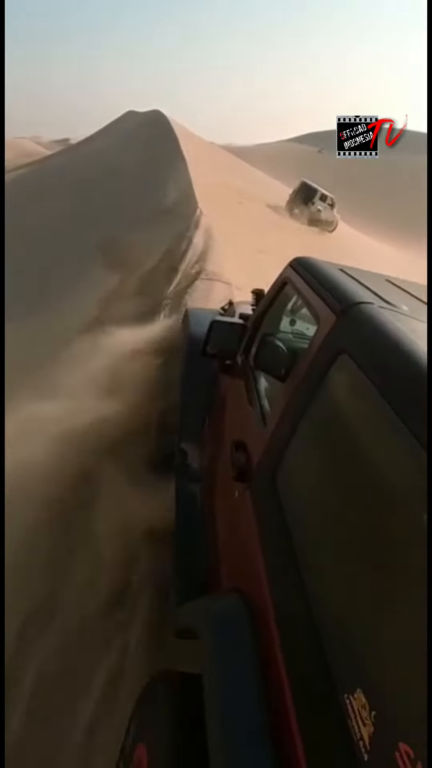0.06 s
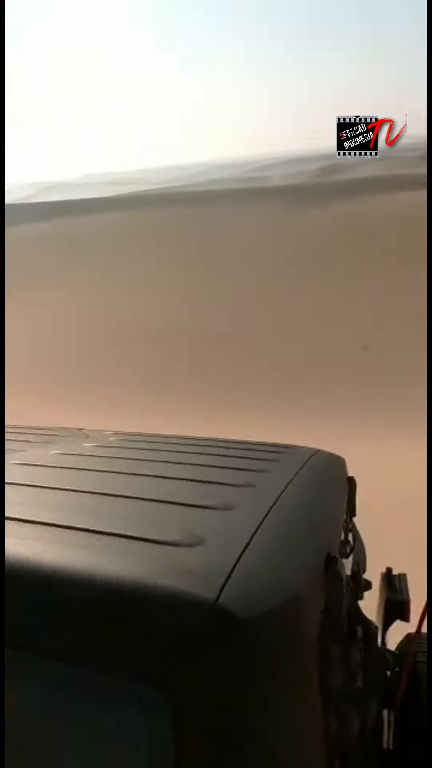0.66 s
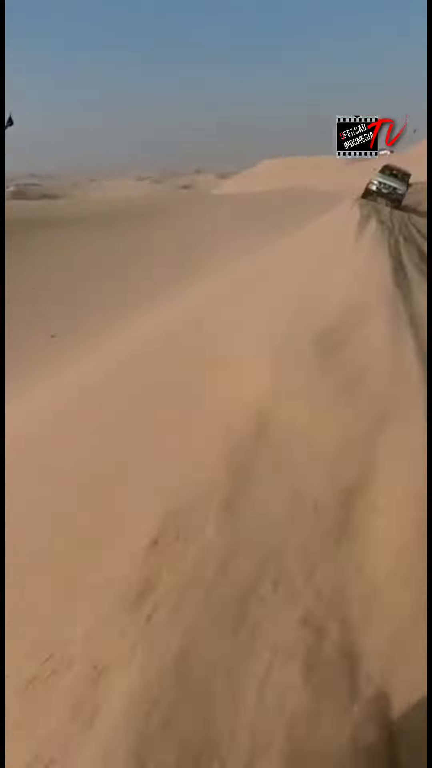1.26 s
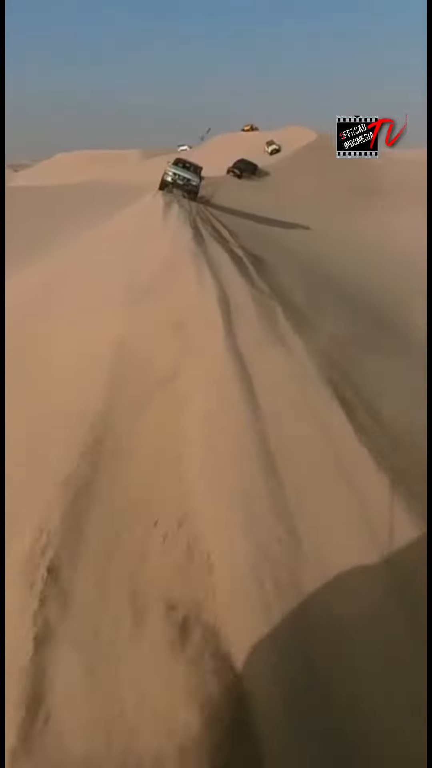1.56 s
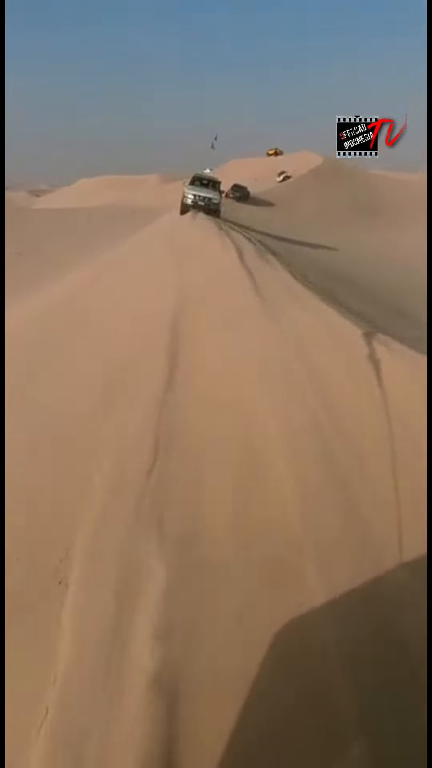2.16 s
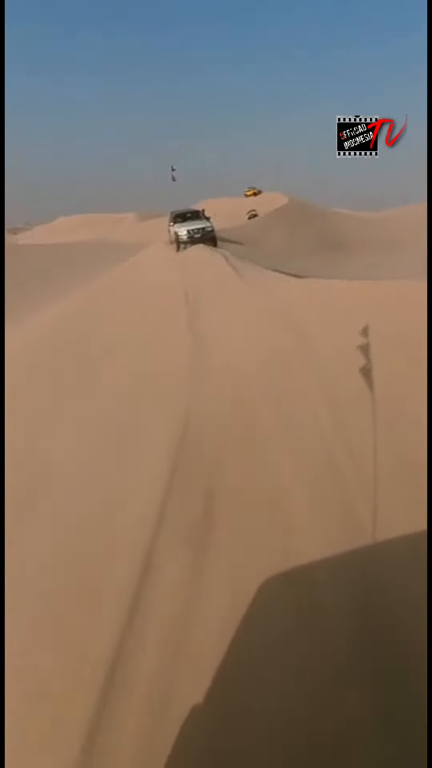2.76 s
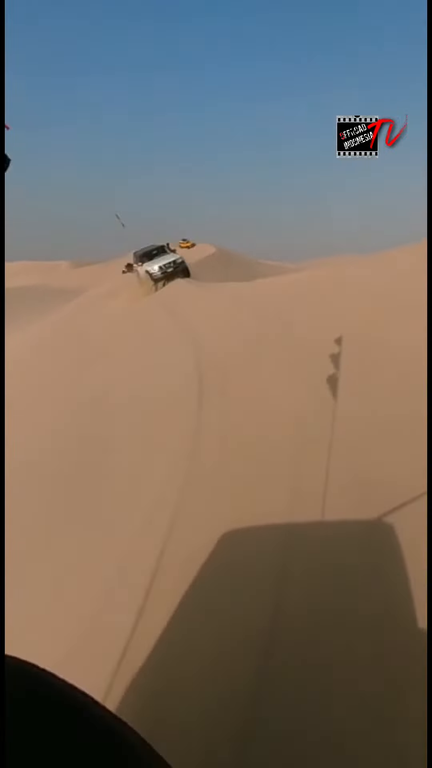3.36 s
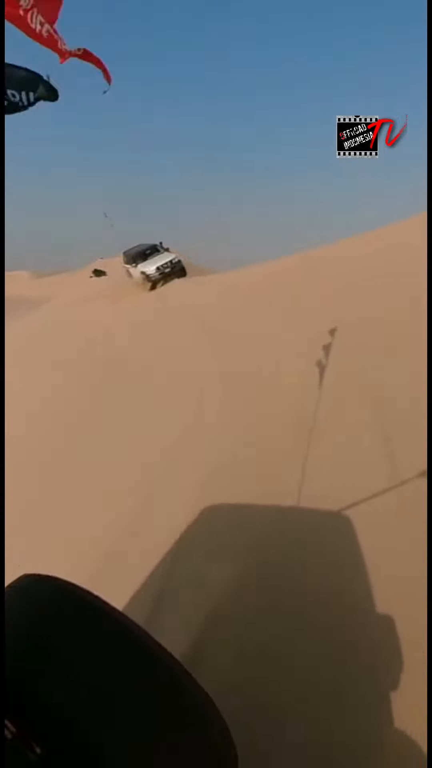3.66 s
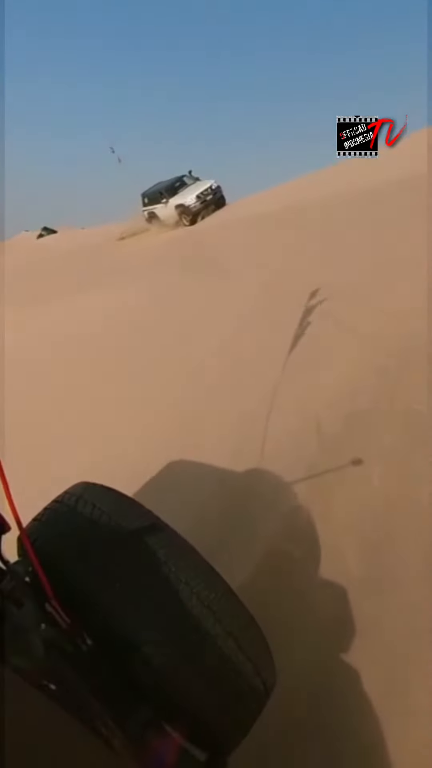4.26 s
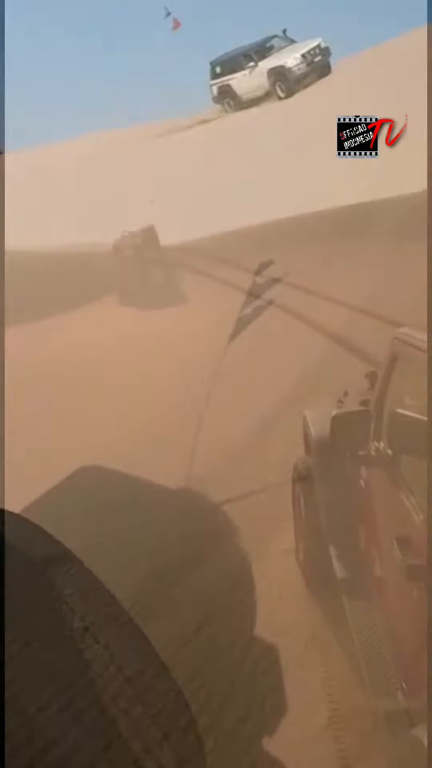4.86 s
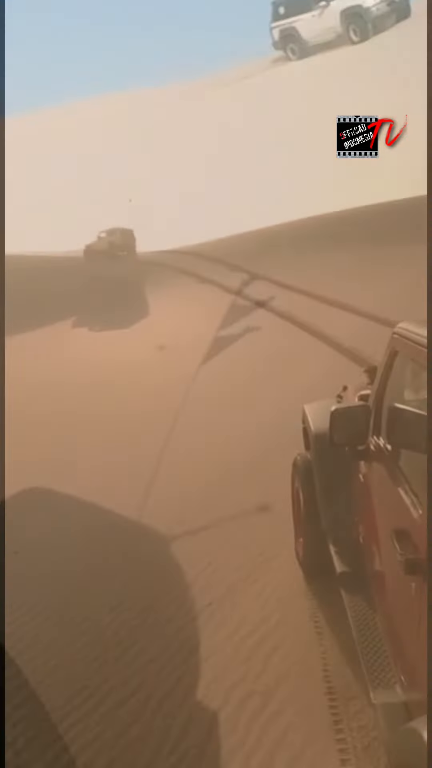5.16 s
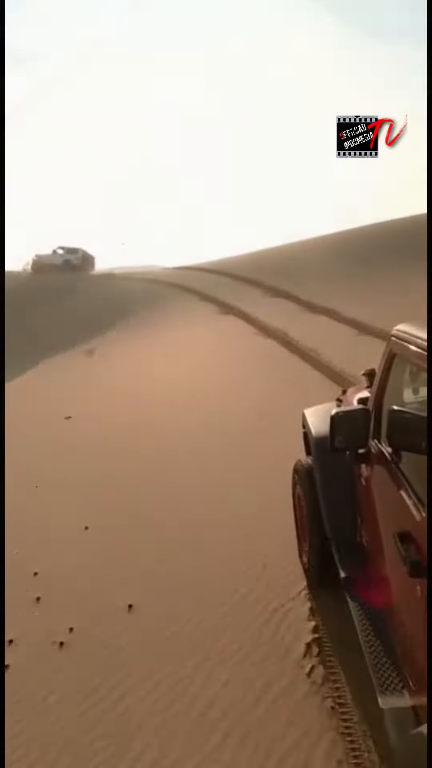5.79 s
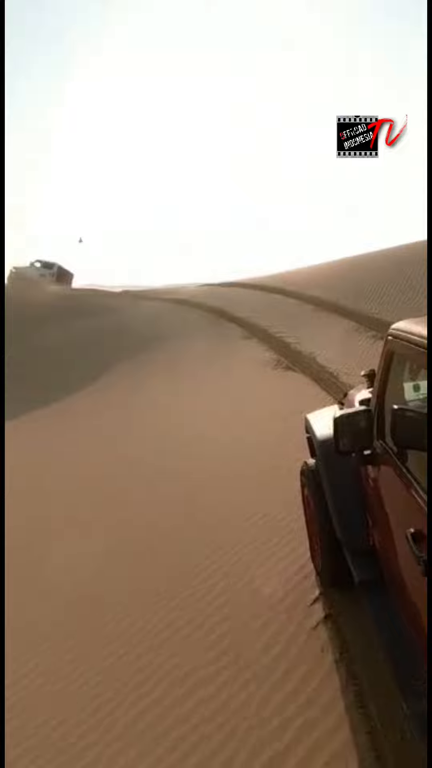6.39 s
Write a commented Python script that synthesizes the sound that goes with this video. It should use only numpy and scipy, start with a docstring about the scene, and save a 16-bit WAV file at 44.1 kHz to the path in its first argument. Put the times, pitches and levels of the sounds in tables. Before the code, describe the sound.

A four-wheel-drive engine drones close by on soft sand, sagging and revving again, while heavy wind rumbles and pops on the microphone.

```python
"""An engine drones close by in buffeting wind: a four-wheel-drive on soft dunes, the microphone held out
beside its body. The engine sags, pulls and revs up again over a gear whine and the roar and hiss of sand
under the tyres; another car swells in from behind. Wind rumbles, thumps and pops on the microphone and
grains tick on its housing; the level dips briefly after loud pops, and deeply after the hardest blow."""
import sys
import numpy as np
from scipy import signal
from scipy.fft import rfft, irfft
from scipy.io import wavfile
from scipy.ndimage import uniform_filter1d, minimum_filter1d

SR = 44100
rng = np.random.default_rng(int(sys.argv[2]) if len(sys.argv) > 2 else 0)


def generate_wav(signal):
    """Clip the signal to [-1, 1] and save it as 16-bit WAV at the path in sys.argv[1]."""
    frames = np.transpose(np.atleast_2d(signal))
    scaled = np.clip(frames, -1, 1) * 32767
    pcm = np.round(scaled).astype(np.int16)
    wavfile.write(sys.argv[1], SR, pcm)


N = 292383
TIME = np.arange(N) / SR
BINS = np.fft.rfftfreq(N, 1 / SR)
BLOW_S = 4.0539  # the hardest blow of air hits the microphone

# eddies that pop on the microphone: (time [s], relative level [dB], centre [Hz])
POPS = [(0.09, -6.5, 226), (1.094, 2.5, 102.7), (1.104, -19, 323), (1.144, -13, 295), (1.324, -4, 147.6),
        (1.634, -15, 418.4), (1.92, -18, 446), (2.06, -18, 352.1), (2.123, -2.5, 148), (2.129, -3.5, 191),
        (2.1327, -6, 204), (2.284, -16.5, 302), (2.293, -4.5, 205), (2.306, -8, 251), (2.314, 1.5, 150),
        (2.317, -8.5, 247), (2.374, -9.5, 160.8), (2.38, -30, 245), (2.48, -16.5, 196), (2.505, -21, 211),
        (2.658, -25.5, 393), (3.217, -20, 302.8), (3.595, -16, 187.6), (4.017, -14.5, 196)]


def amp(db):
    """Decibels to gain."""
    return 10 ** (np.asarray(db) / 20)


def unit_rms(x):
    """Scales to rms 1."""
    return x / np.sqrt(np.mean(x ** 2) + 1e-20)


def curves(rows):
    """Each column of a table, joined by straight lines in time."""
    s, *columns = np.transpose(rows)
    return [np.interp(TIME, s, c) for c in columns]


def bump(s, length):
    """A smooth swell of height 1 around a time."""
    return np.exp(-(2 * (TIME - s) / length) ** 2)


def noise(spectrum):
    """Noise of rms 1 with the given spectrum."""
    hz, db = np.transpose(spectrum)
    colour = amp(np.interp(np.log(BINS + 1), np.log(hz), db))
    return unit_rms(irfft(rfft(rng.standard_normal(N)) * colour, N))


def drift(rate_hz):
    """A random wander of rms 1, up to about the given rate."""
    return unit_rms(irfft(rfft(rng.standard_normal(N)) / (1 + (BINS / rate_hz) ** 4), N))


def filtered(x, hz, kind, order):
    """A causal low-pass or high-pass."""
    return signal.sosfilt(signal.butter(order, hz, kind, fs=SR, output="sos"), x)


def add(mix, s, sound):
    """Mixes a sound in at a time."""
    part = mix[max(round(s * SR), 0):][:len(sound)]
    part += sound[:len(part)]


def partial(turns, flutter, smear):
    """A tone that wavers in strength (flutter) and phase (smear) as the moving air carries it."""
    phase = 2 * np.pi * (turns + rng.random()) + smear * drift(rate_hz=5.7)
    return np.sqrt(2) * np.cos(phase) * (1 + flutter * drift(rate_hz=32))


def resonance_db(modes, hz):
    """The gain that a gliding tone picks up from a table of resonances."""
    return sum(db / (1 + (2 * (hz - centre) / width) ** 2) for centre, width, db in modes)


def click(top_hz):
    """A dry click of height 1."""
    pulse = filtered(signal.unit_impulse(256), top_hz, "low", order=6)
    pulse = filtered(pulse, 3400, "low", order=1)
    return pulse / abs(pulse).max()


def follower():
    """The car behind: its drone carries over in swells, each on a rising note."""
    # swells: (start [s], length [s], first pitch [Hz], last pitch [Hz], top level [dB])
    swells = [(1.621, 0.8, 211.1, 253, -25), (2.852, 0.64, 267, 297.2, -31.5),
              (4.453, 1, 266.5, 277.3, -34)]
    out = np.zeros(N)
    for start, length, first_hz, last_hz, db in swells:
        progress = np.clip((TIME - start) / length, 0, 1)
        turns = np.cumsum(first_hz + (last_hz - first_hz) * progress) / SR
        out += amp(db) * np.sin(np.pi * progress) ** 2 * partial(turns, flutter=0.39, smear=0.05)
    return out


def grit(spread_db=5.5):
    """Blown grains hit the microphone's housing one by one, coarse then fine; a few are larger."""
    # showers: (start [s], end [s], rate [1/s], level before filtering [dB], low [Hz], high [Hz])
    showers = [(0, 4.2, 35, -59, 2800, 5500), (4.3, 6, 50, -64, 6000, 15000)]
    out = np.zeros(N)
    for start, end, per_s, db, low_hz, high_hz in showers:
        size_db = spread_db * np.minimum(rng.exponential(1, N), 2)
        hits = (rng.random(N) < per_s / SR) * (TIME > start) * (TIME < end)
        grains = filtered(hits * amp(db + size_db), low_hz, "high", order=2)
        out += filtered(grains, high_hz, "low", order=4)
    return out


def ticks():
    """A few tiny, separate clicks."""
    # dry clicks: (time [s], peak [dB], treble cutoff [Hz])
    clicks = [(1.070, -32.5, 6400), (2.11, -39.5, 5000), (3.871, -26, 14000), (4.0393, -31.5, 7000),
              (4.0993, -49, 3400), (5.89, -33.5, 12600)]
    out = np.zeros(N)
    for s, db, hz in clicks:
        add(out, s, amp(db) * click(hz))
    return out


def wind_db():
    """Strength of the wind at the microphone: a slow trend with gusts and lulls on top."""
    # wind trend: (time [s], relative level [dB])
    trend_points = [(0, -21.5), (1.1, -20.5), (2.4, -18.5), (4.05, -20), (4.2, -30), (5.25, -27.5),
                    (6.05, -19), (6.63, -19)]
    # gusts (+) and lulls (-): (time [s], length [s], change [dB])
    gusts = [(0.288, 0.031, -8.5), (1.463, 0.04, -5.5), (2.166, 0.019, -14), (2.432, 0.03, -9.5),
             (2.954, 0.02, -9), (3.384, 0.2, 3), (3.489, 0.056, -11), (3.6, 0.12, 7), (3.73, 0.2, -11),
             (5.286, 0.05, 8.5), (5.418, .1, -4.5)]
    trend, = curves(trend_points)
    return trend + sum(db * bump(s, length) for s, length, db in gusts)


def wind(gain_db=1.5, steadiness=0.79, chop_db=2.0):
    """Low turbulence on the microphone, swelling with each gust and chopped by quick buffets."""
    # rumble spectrum: (frequency [Hz], relative density [dB])
    spectrum = [(15, -19), (30, -11), (48, 1), (70, -1.5), (115, -2.5), (160, -6.5), (230, -17),
                (400, -31.5), (2000, -92.5)]
    rumble = noise(spectrum)
    envelope = np.sqrt(abs(uniform_filter1d(rumble ** 2, size=4000)) + 1e-6)
    steadied = unit_rms(rumble / envelope ** steadiness)
    return amp(wind_db() + gain_db + chop_db * drift(rate_hz=11)) * steadied


def buffeted(rumble, pitch_hz=78, length_s=.024, displaced=.6):
    """Big slow eddies displace part of the rumble and thump: a swing or two of air in the port."""
    # thumps on the microphone: (time [s], level [dB])
    thumps = [(0.468, -11), (0.745, -11.5), (1.094, -7.5), (1.153, -10.5), (1.237, -9.5), (2.011, -11),
              (2.451, -8), (2.549, -8), (2.697, -8.5), (2.736, -8), (3.286, -6), (3.439, -6.5),
              (3.603, -7.5), (5.981, -9.5), (6.072, -7.5), (6.345, -7)]
    for s, db in thumps:
        phase, speed = rng.random(2)
        swell = bump(s, length_s)
        hz = pitch_hz * (.88 + .24 * speed)
        swing = np.cos(2 * np.pi * (hz * (TIME - s) + phase))
        rumble = rumble * (1 - displaced * swell) + amp(db) * swell * swing
    return rumble


def eddy(hz):
    """A vortex passes the microphone's port: a pressure swing, shorter when faster, then a weaker wake."""
    angle = 2 * np.pi * hz * np.arange(-1024, 1024) / SR
    lag = rng.uniform(1.5, 4)
    front, wake = np.exp(2j * np.pi * rng.random(2))
    swing = front / (1 - 1j * angle) ** 2 + .7 * wake / (1 - 1j * (angle - lag)) ** 3
    return swing.real * signal.windows.hann(len(angle))


def eddies(rows):
    """Mixes one eddy for each row of (time [s], level [dB], centre [Hz])."""
    out = np.zeros(N)
    for s, db, hz in rows:
        pulse = eddy(hz)
        add(out, s - len(pulse) / 2 / SR, amp(db) * pulse)
    return out


def puffs(gain_db=-7, spread_db=6, centre_hz=88, count=70):
    """Dull eddies reach the microphone at random, louder in the gusts."""
    floor_db = wind_db() + gain_db
    rows = [(when * N / SR, floor_db[int(when * N)] + spread_db * size, centre_hz * 2 ** (speed - .5))
            for when, size, speed in rng.random((count, 3))]
    return eddies(rows)


def pops(gain_db=-1.5, thud_db=-4.5, thud_hz=70, crunch=0.07, crunch_hz=700):
    """Large eddies pop on the microphone, each with a low thud; fine turbulence inside them crunches."""
    thuds = [(s, db + thud_db, thud_hz) for s, db, _ in POPS]
    pressure = eddies(list(POPS) + thuds)
    turbulence = unit_rms(filtered(rng.standard_normal(N), crunch_hz, "low", order=3))
    return amp(gain_db) * pressure * (1 + crunch * turbulence)


def pop_dips(threshold_db=-11, share=0.75, recovery_s=0.12):
    """A gain that dips briefly after each loud pop, by a share of its excess over the threshold."""
    dips_db = [share * (db - threshold_db) * (TIME > s) * np.exp(-abs(TIME - s) / recovery_s)
               for s, db, _ in POPS]
    deepest_db = np.maximum(np.max(dips_db, axis=0), 0)
    return amp(-uniform_filter1d(deepest_db, size=400))


def blow(clip_db=-2.8, over_db=.8, crack_db=-24, fall_s=0.007, front_hz=900, port_hz=80, port_q=1.13):
    """A crack, then a step of air pressure flattens against the microphone's limit; the port swings back."""
    step = filtered(np.exp(-np.arange(4096) / SR / fall_s), front_hz, "low", order=2)
    omega = 2 * np.pi * port_hz
    port_highpass = signal.bilinear([1, 0, 0], [1, omega / port_q, omega ** 2], SR)
    push = signal.lfilter(*port_highpass, step)
    clipped = np.clip(amp(over_db) * push / abs(push).max(), -1, 1)
    out = np.zeros(N)
    add(out, BLOW_S - .0003, amp(crack_db) * click(top_hz=8000))
    add(out, BLOW_S, amp(clip_db) * clipped)
    return out


def blow_dip(depth_db=24, recovery_s=0.12, lead_s=0.0057):
    """A gain that drops at the hardest blow and creeps back."""
    since = TIME - BLOW_S + lead_s
    drop = (since > 0) * np.exp(-abs(since) / recovery_s)
    return amp(-depth_db * uniform_filter1d(drop, size=200))


def splashes():
    """Short swells of sand thrown against the body."""
    # throws of sand: (time [s], length [s], level [dB])
    throws = [(3.546, 0.037, -43.5), (3.855, 0.026, -37.5), (4.44, 0.38, -42.5), (5.917, 0.13, -42)]
    # their spectrum: (frequency [Hz], relative density [dB])
    spectrum = [(300, 1.5), (900, 8.5), (1400, -3), (2600, -21), (4500, -44), (9000, -60.5)]
    return sum(amp(db) * bump(s, length) for s, length, db in throws) * noise(spectrum)


def tyres(firing_turns, roar_db=-27, spray_db=-53.5, clump_db=1.1, throb=0.39, door_db=4.5):
    """Tyres churn the ground and throw sand in clumps; the roar throbs with the firing."""
    # how hard the tyres churn: (time [s], effort [dB])
    churn = [(0, 4), (.4, 2.5), (.8, -2), (1.08, 0.5), (1.24, -3.5), (1.95, 2.5), (2.5, -6.5), (2.72, -8.5),
             (3.03, -0.8), (3.24, -2.5), (3.44, -10.5), (3.83, -3.5), (4.17, -10.5), (4.45, -4),
             (5.1, -3.5), (5.37, -11), (5.84, -3.5), (5.9, 0.1), (6.63, 0.1)]
    # tyre roar: (frequency [Hz], relative density [dB])
    roar_spectrum = [(40, -17), (130, 10.5), (290, 4.5), (450, 5.5), (620, -3), (800, -11), (1200, -18),
                     (2000, -42), (7000, -81.5)]
    # sand spray: (frequency [Hz], relative density [dB])
    spray_spectrum = [(300, -5), (900, -4), (1500, 5.5), (2200, 0.5), (3000, -7), (3700, -15.5),
                      (4500, -30.5), (5500, -28), (6400, -17), (7100, -16), (8000, -20), (9200, -44),
                      (15000, -52.5)]
    effort, = curves(churn)
    by_door = np.clip((TIME - 4.69) / 0.76, 0, 1)  # more spray is heard alongside the door
    clumps = clump_db * drift(rate_hz=18)
    roar = amp(roar_db + 0.98 * effort + clumps) * noise(roar_spectrum)
    spray = amp(spray_db + 0.99 * effort + door_db * by_door + clumps) * noise(spray_spectrum)
    return roar * (1 + throb * np.cos(2 * np.pi * firing_turns)) + spray


def intake(middle_s=1.97, length_s=.55, pitch_hz=2298, glide_hz_per_s=-165, level_db=-62, rough=0.85):
    """A faint whistle as the engine sags, roughened by the air rushing through the intake."""
    hz = pitch_hz + glide_hz_per_s * (TIME - middle_s)
    tone = partial(np.cumsum(hz) / SR, flutter=.3, smear=2)
    breathy = unit_rms(tone * (1 + rough * drift(rate_hz=70)))
    return amp(level_db) * bump(middle_s, length_s) * breathy


def driveline(blur_cycles=.22):
    """Gear whine rises and falls with the speed of the wheels, and blurs into a fuzzy band midway."""
    # whine: (time [s], gear mesh rate [Hz], level [dB])
    whine = [(.7, 618, -50.5), (.98, 589, -36), (1.25, 590, -41), (1.45, 568, -40), (1.8, 522.5, -45),
             (2.4, 458.3, -54.5), (2.75, 446, -37), (3.2, 430.2, -35.5), (4.05, 413.5, -48.5),
             (4.62, 450.7, -36.5), (5.2, 467.8, -42.5), (5.8, 453.5, -41), (6.3, 431.7, -26),
             (6.63, 415.7, -37)]
    hz, db = curves(whine)
    blur = blur_cycles * bump(s=3.1, length=1.6) * drift(rate_hz=18)
    return amp(db) * partial(np.cumsum(hz) / SR + blur, flutter=.2, smear=.25)


def engine(bonnet_db=18, full_pull_db=1.5, full_pull_hz_per_s=190):
    """Firing tone, octave and rasp, close up; unequal cylinders add orders between the whole ones."""
    # firing tone: (time [s], firing rate [Hz], level [dB])
    firing = [(0, 217.5, -24.5), (.15, 218, -23.5), (.5, 205.6, -19.5), (.87, 189.9, -26.5),
              (1.05, 188, -20.5), (1.3, 182.4, -35), (1.6, 172.4, -22), (1.85, 163.9, -29),
              (2.15, 161, -24), (2.75, 165.8, -42), (3.15, 171, -18.5), (3.45, 170.5, -26),
              (3.83, 171.3, -19.5), (3.98, 169, -29), (4.15, 163.3, -31), (4.55, 188.2, -30),
              (5.4, 212.9, -49), (6.05, 199.8, -30.5), (6.63, 208, -28.5)]
    # base levels of the exhaust's overtones: (time [s], octave [dB], rasp [dB])
    overtones = [(0, -47, -53), (.5, -32, -36.5), (.98, -27.5, -40), (1.17, -39.5, -40), (1.5, -27.5, -36),
                 (2.12, -30.5, -37), (2.5, -50.5, -61), (3.15, -38, -57), (3.95, -44, -66),
                 (4.17, -38.5, -37.5), (4.48, -35.5, -38), (4.9, -59.5, -54.5), (5.45, -64, -57),
                 (6.3, -51.5, -45), (6.63, -29, -64)]
    # orders of the rasp: (multiple of the firing rate, relative level [dB])
    orders = [(2.83, -4.5), (3, -2.5), (3.831, -16.5), (4.001, -17.5), (4.83, -26), (4.999, -22),
              (5.829, -25.5), (5.999, -26.5), (7, -29.5)]
    # exhaust resonances: (centre [Hz], width [Hz], gain [dB])
    pipe_modes = [(478, 44, 6), (612, 40, 6), (672, 50, 4)]
    # engine bay resonances: (centre [Hz], width [Hz], gain [dB])
    bay_modes = [(1078, 46, 13.5), (1275, 80, 5)]
    hz, firing_db = curves(firing)
    octave_db, rasp_db = curves(overtones)
    # pulling favours the whole orders of the rasp; overrun, the octave and the orders in between
    rise_hz_per_s = uniform_filter1d(np.gradient(hz) * SR, size=8000)
    pull_db = full_pull_db * np.tanh(rise_hz_per_s / full_pull_hz_per_s)
    turns = np.cumsum(hz * (1 + 0.0011 * drift(rate_hz=18))) / SR
    out = amp(firing_db) * partial(turns, flutter=0.22, smear=0.05)
    out += amp(octave_db - pull_db) * partial(2 * turns, flutter=0.14, smear=0.06)
    # the bay and the upper orders ring out until the microphone has turned away from the bonnet
    facing = np.interp(TIME, [0.043, 0.96], [1, 0])
    for multiple, db in orders:
        upper = multiple > 3.5
        between = abs(multiple - round(multiple)) > .1
        pipe_db = resonance_db(pipe_modes, multiple * hz)
        bay_db = facing * (resonance_db(bay_modes, multiple * hz) + bonnet_db * upper)
        level_db = rasp_db + db + (-pull_db if between else pull_db) + pipe_db + bay_db
        out += amp(level_db) * partial(multiple * turns, flutter=0.2, smear=0.045 * multiple)
    return out, turns


def scene():
    """Both cars, sand and wind at one microphone beside the body."""
    exhaust, firing_turns = engine()
    cars = exhaust + driveline() + intake() + follower() + tyres(firing_turns) + splashes()
    drive = cars * pop_dips() + buffeted(wind()) + pops() + puffs()
    return (drive * blow_dip() + blow() + ticks() + grit())[None]


def record(dry):
    """A fast limiter holds down the strongest gusts; a steep low-pass cuts the top treble."""
    ceiling, cutoff_hz = .73, 15500
    needed_gain = np.minimum(1, ceiling / (abs(dry) + 1e-9))
    held_gain = minimum_filter1d(needed_gain, size=400)
    gain = uniform_filter1d(uniform_filter1d(held_gain, size=200), size=200)
    end_fades = signal.windows.tukey(N, .001)
    return filtered(dry * gain * end_fades, cutoff_hz, "low", order=16)


dry = scene()
out = record(dry)
generate_wav(out)
```